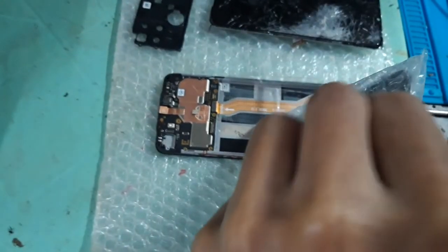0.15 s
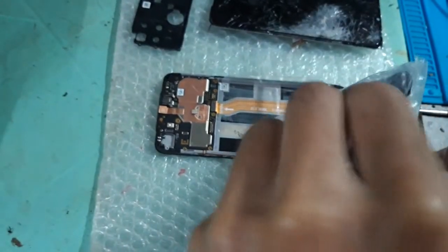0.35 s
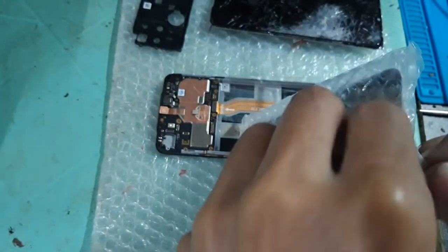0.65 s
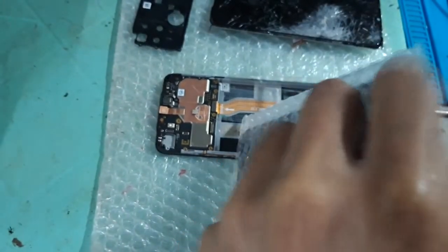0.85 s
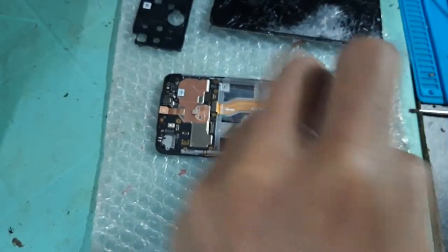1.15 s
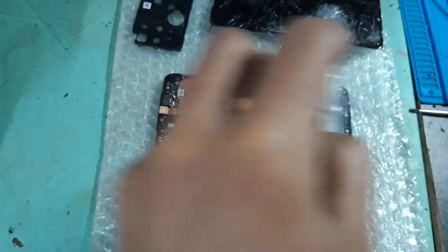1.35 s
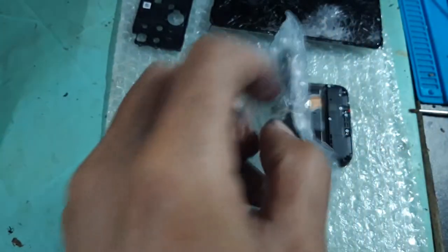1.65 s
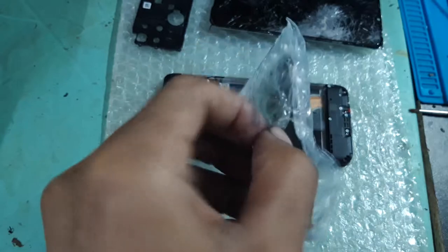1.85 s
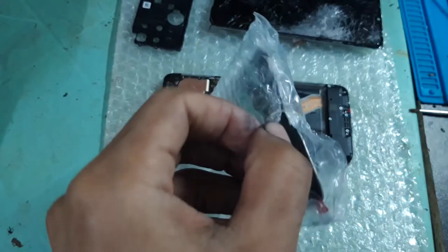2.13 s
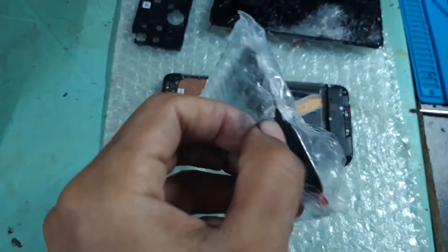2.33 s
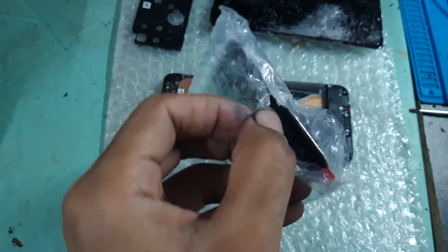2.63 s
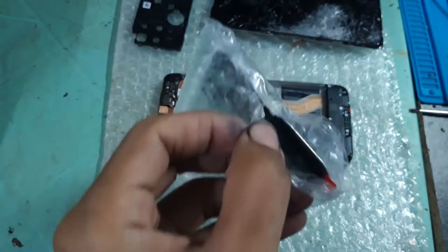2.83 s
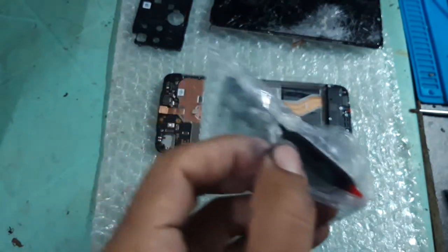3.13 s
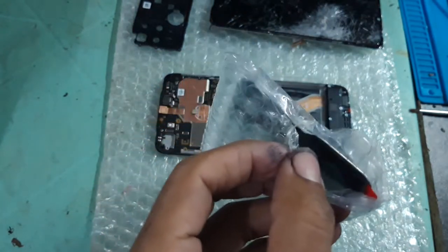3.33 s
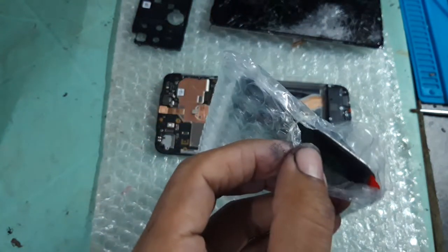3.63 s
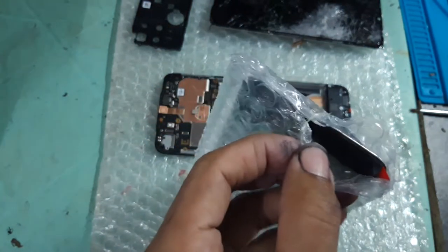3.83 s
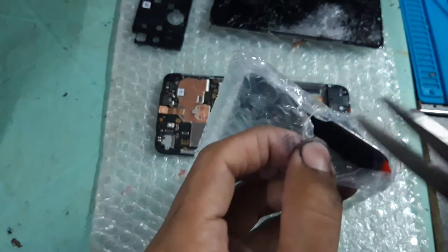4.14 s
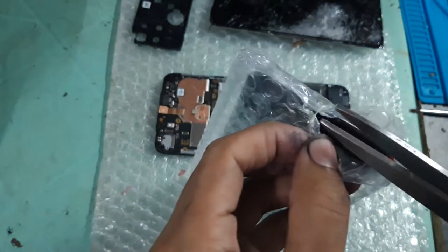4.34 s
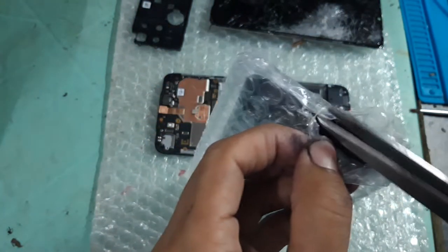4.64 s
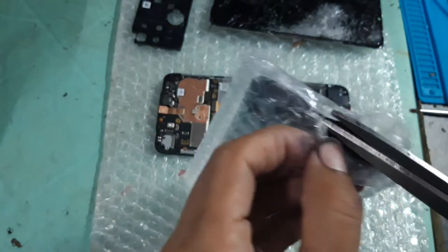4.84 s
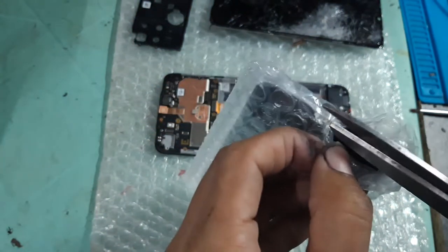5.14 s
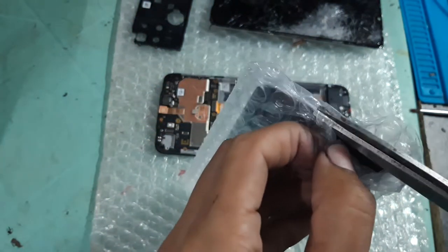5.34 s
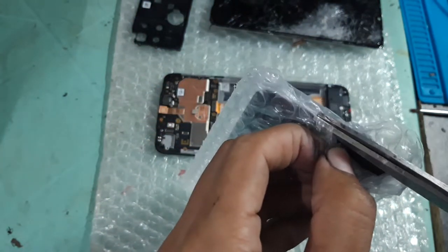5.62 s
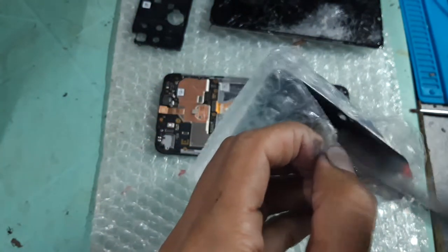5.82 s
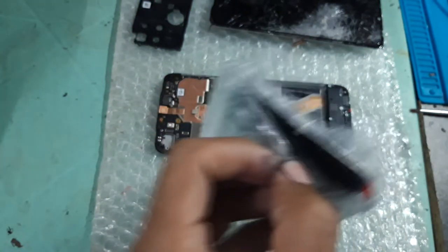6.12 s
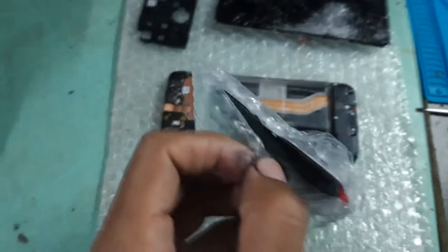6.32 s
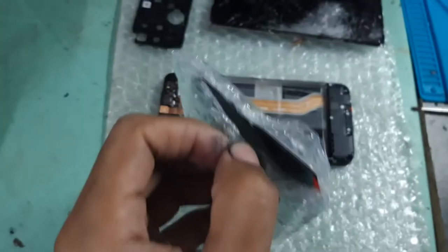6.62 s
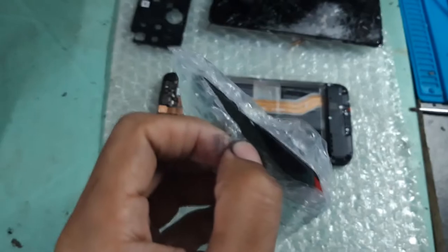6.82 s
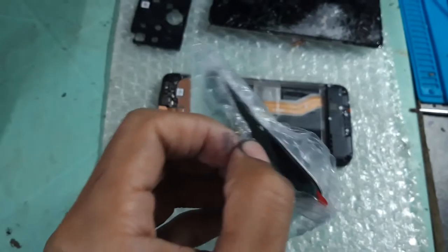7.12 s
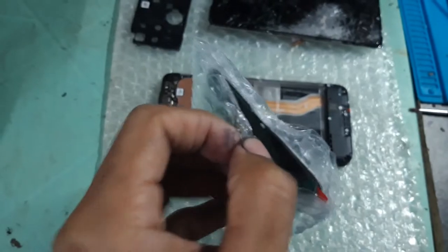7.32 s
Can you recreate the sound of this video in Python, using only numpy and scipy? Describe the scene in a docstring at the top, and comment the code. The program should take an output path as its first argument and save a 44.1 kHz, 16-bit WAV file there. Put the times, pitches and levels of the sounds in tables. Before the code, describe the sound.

A close microphone at a workbench in a small room picks up a low airy murmur, soft hiss and faint bench sway. From 0 to 1.6 s a thin plastic bag rustles lightly with dry, bright snaps, one much louder at 0.3 s. From 2.0 to 2.4 s steel tools clink and skid quietly. At 2.98 s comes a hard, ringing knock on the bench with a brief judder, then short gritty scissor scrapes from 3.1 to 3.5 s. Sparse crinkles continue, with a soft brush of blade on film at 4.85 s. At 5.7 s the scissors snip very loudly, with a short dull thump, a fading grind and a strong plastic snap. The background sinks; a tiny squeak at 6.2 s precedes a sharp blade clack at 6.35 s. From 6.9 s to the end, tools knock and rattle brightly, with a dull thump near 7 s, while the plastic is quiet.

```python
"""A thin plastic bag crinkles close to a phone above a workbench: each crease is a sharp ringing pulse,
and countless tiny ones make a rustle. A part in the bag is lifted off bubble wrap and turned in one hand.
The other hand rummages for scissors, knocks and drags them, snips the bag open and lays them back among tools:
bursts of tiny random impacts ring steel and bench, and damped swings make the thumps.
Behind it lies coloured noise: a low sway of the bench, and room noise that sinks after the snip."""
import sys
import numpy as np
from scipy import signal
from scipy.fft import rfft, irfft
from scipy.io import wavfile

SR = 44100
rng = np.random.default_rng(int(sys.argv[2]) if len(sys.argv) > 2 else 0)


def materialize(psi):
    """Save the field psi as 16-bit PCM at rate SR to the path in sys.argv[1].

    A 1-D psi becomes a single channel; in a 2-D psi each row is a channel.
    """
    bounded = np.clip(np.atleast_2d(psi).T, -1, 1)
    quanta = np.round(bounded * 32767).astype(np.int16)
    wavfile.write(sys.argv[1], SR, quanta)


N = 329427  # length in samples
TIME = np.arange(N) / SR  # s
SIZE = 8192  # samples behind each spectrum
FREQS = np.maximum(np.fft.rfftfreq(SIZE, 1 / SR), 1)  # Hz
OCTAVES = np.log2(FREQS + 200)  # scale for tilting a spectrum; it flattens out in the bass


def amp(db):
    """Turn decibels into a gain."""
    return 10 ** (np.asarray(db) / 20)


def unit(x):
    """Scale a sound to an rms of one."""
    return x / np.sqrt(np.mean(x ** 2))


def curve(rows):
    """Join rows of (t/s, value) by straight lines."""
    return np.interp(TIME, *np.transpose(rows))


def swells(rows, rest_db):
    """Level in dB of smooth movements that rise from rest and sink back; their powers add up."""
    moves = 0
    for middle, half_length, db in rows:
        moves = moves + amp(db) ** 2 * np.exp(-2 * ((TIME - middle) / half_length) ** 2)
    return 10 * np.log10(amp(rest_db) ** 2 + moves)


def add(out, start_s, x):
    """Mix the sound x into out from start_s on."""
    first = max(int(start_s * SR), 0)
    out[first:first + len(x)] += x[:max(N - first, 0)]


def through(x, response):
    """Let x ring a body, given the body's answer to a single click."""
    return signal.fftconvolve(x, response)[:N]


def spectrum(points, modes=()):
    """A broad colour in dB, with the narrow peaks of a ringing body standing on it."""
    hz, db = np.transpose(points)
    broad = np.interp(np.log(FREQS), np.log(hz), db)
    peaks = sum(amp(2 * gain) / (1 + (2 * (FREQS - f) / width) ** 2) for f, width, gain in modes)
    return broad + 10 * np.log10(1 + peaks)


def ring(db):
    """A body's answer to a click: it starts at once, has the given spectrum and an energy of one."""
    # folding the cepstrum gives the minimum-phase response, with its energy as early as possible
    cepstrum = irfft(np.log(amp(db)))
    cepstrum[1:SIZE // 2] *= 2
    cepstrum[SIZE // 2 + 1:] = 0
    response = irfft(np.exp(rfft(cepstrum)))[:SIZE // 2]
    return response / np.linalg.norm(response)


def friction(response, db, rise, length, grit_db, release):
    """One sliding contact: dense uneven tiny impacts swell, hold and let go, ringing a body (times in s)."""
    t = np.arange(int((length + 10 * release) * SR) + 2) / SR
    swell = np.minimum(t / max(rise, 1 / SR), 1)
    push = swell * np.exp(-np.maximum(t - length, 0) / release)
    # more grit makes the impacts more uneven
    impacts = rng.standard_normal(len(t)) * amp(grit_db * rng.standard_normal(len(t)))
    x = signal.fftconvolve(push * impacts, response)
    return x * amp(db) * np.linalg.norm(push) / np.linalg.norm(x)


def echoes(x, wet_db, t60_low, t60_high, delay=0.0041):
    """Add the reflections of bench and walls; bass and treble each take their own time in s to fade by 60 dB."""
    t = np.arange(SR // 2) / SR
    noise = rng.standard_normal(len(t))
    low = signal.sosfilt(signal.butter(2, 3000, fs=SR, output="sos"), noise)
    high = signal.sosfilt(signal.butter(2, 3000, "high", fs=SR, output="sos"), noise)
    low = low * np.exp(-np.log(1000) * t / t60_low)
    high = high * np.exp(-np.log(1000) * t / t60_high)
    # the minus keeps the two bands from cancelling where they meet
    tail = (low - high) * (t > delay)
    return x + amp(wet_db) * through(x, tail / np.linalg.norm(tail))


def snap(hz, octaves, skirt_db=36, flutter=.06, flutter_s=0.0034):
    """A crease flips: one sharp pulse of a small facet of film, then a brief flutter of the sheet around it."""
    # the ring falls off faster above its centre than below
    distance = np.where(FREQS < hz, np.log2(FREQS / hz), (FREQS / hz - 1) / np.log(2))
    shape_db = skirt_db * (np.exp(-(distance / octaves) ** 2 / 7) - 1)
    # so small a facet hardly radiates low notes
    bass_loss_db = 10 * np.log10(1 + (2400 / (FREQS + 500)) ** 4)
    t = np.arange(SIZE // 16) / SR
    kick = flutter * rng.standard_normal(len(t)) * np.exp(-t / flutter_s)
    kick[0] = 1
    x = signal.fftconvolve(kick, ring(shape_db - bass_loss_db))
    return x / np.linalg.norm(x)


# how loud the room noise is before it wavers: (t/s, level/dB)
ROOM_LEVEL = [(0, -51), (1.5, -51), (1.9, -47.5), (3.7, -49), (5.65, -48), (6.1, -57), (6.85, -60.5),
              (7.1, -52)]
# colour of the room noise: (f/Hz, level/dB)
ROOM_NOISE = [(28, -26.5), (60, -11), (100, -9.5), (180, -2), (300, 1.5), (400, -6.5), (600, -6.5),
              (770, -5.5), (930, -10), (1500, -11.5), (3000, -15.5), (7000, -22), (9400, -20.5),
              (10300, -31), (16000, -38.5)]


def room(waver_db=1.22):
    """Low murmur of air in the room under a soft hiss: coloured noise whose level wavers slightly."""
    noise = unit(through(rng.standard_normal(N), ring(spectrum(ROOM_NOISE))))
    knots = np.arange(0, N / SR, 1 / 10)  # ten random levels a second
    waver = np.interp(TIME, knots, rng.standard_normal(len(knots)))
    return noise * amp(curve(ROOM_LEVEL) + waver_db * waver)


ARMS_RESTING_DB = -68
# the arms move and sway the bench: (middle t/s, half length/s, level/dB)
ARM_MOVES = [(.28, .13, -57), (1.3, .08, -59), (1.68, .06, -60), (2.25, .2, -55), (4.45, .2, -60),
             (7.42, .1, -54)]


def rumble():
    """A soft low swaying of the bench: deep noise that swells as the arms move."""
    colour = spectrum([(20, -36), (42, -5), (56, 1), (80, -14.5), (200, -50)])  # (f/Hz, level/dB)
    noise = through(rng.standard_normal(N), ring(colour))
    return unit(noise) * amp(swells(ARM_MOVES, ARMS_RESTING_DB))


# dull thumps through bench and phone stand:
# (t/s, level/dB before build-up and fading, f/Hz, rise/s, time to fade by 60 dB/s)
THUMPS = [(5.7094, 8.5, 400, 0.000103, 0.00271), (5.7104, -5, 71.2, 0.00041, 0.036),
          (5.7165, -12.5, 87.5, 0.0009, .024), (6.231, -25, 970, .0001, 0.00302),
          (6.2325, -33, 152, 0.00057, 0.033), (6.980, -13.5, 556.5, 0.00301, 0.0485)]


def thumps(crack_db=-1.5, crack_s=0.001215, crack_hz=2000):
    """Each jolt is a few quickly damped swings with a crack at the contact; the next one swings the other way."""
    out, t = np.zeros(N), np.arange(SIZE) / SR
    dull = signal.butter(1, min(crack_hz, SR / 3), fs=SR, output="sos")
    for k, (s, db, hz, rise, t60) in enumerate(THUMPS):
        swing = np.sin(2 * np.pi * hz * t) * np.exp(-np.log(1000) * t / t60)
        crack = signal.sosfilt(dull, rng.standard_normal(SIZE)) * np.exp(-t / crack_s)
        # a harder contact both rings higher and cracks more
        crack = amp(crack_db) * hz / 700 * crack
        direction = -(-1) ** k
        add(out, s, direction * amp(db) * (swing + crack) * (1 - np.exp(-t / rise)))
    return out


# steel tools bump into each other:
# (t/s, level/dB, length/s, tilt/dB per octave, f/Hz at which the touched piece rings)
SCUFFS = [(2.031, -38, .011, -4, 485), (2.062, -40, .012, -2, 3870), (2.104, -45, .008, -1.5, 5100),
          (2.165, -35, .008, -1.5, 3750), (2.173, -27.5, .008, -.7, 3750), (2.218, -30, .011, -1.5, 3810),
          (2.255, -29, .009, -.5, 5080), (2.347, -31, .009, -.5, 3800), (6.902, -35, .004, 0, 3380),
          (6.922, -28, .02, 2.2, 8600), (6.972, -23.5, .011, -1, 920), (7.144, -36.5, .006, .5, 4770),
          (7.2085, -22, .0105, 1.5, 9120), (7.319, -28.5, .009, 1, 3820), (7.3578, -19.5, .009, 4.5, 13800),
          (7.377, -26.5, .015, -1, 10800), (7.435, -20.5, .011, .5, 4700)]
# the hand shoves the pile along with growing force: (t/s, final level/dB, length/s, tilt/dB per octave)
SHOVES = [(2.1, -49, .28, -2), (7.005, -36, .03, -1), (7.06, -51, .07, 0), (7.155, -39, .04, -3.5),
          (7.265, -34.5, .045, 1), (7.395, -37, .035, 1), (7.445, -28, .02, .8)]
# broad colour of the steel: (f/Hz, level/dB)
STEEL = [(80, -22.5), (250, -18), (480, -7.5), (750, -11), (1200, -10), (3000, -8), (5500, -7), (9200, -11),
         (10200, -14), (13000, -17), (16000, -23.5)]
# ring of the tools: (f/Hz, width/Hz, level/dB relative to the broad colour)
STEEL_MODES = [(555, 90.5, 9), (931.5, 42.5, 7), (1139, 59, 4), (1735, 38, -5), (3780, 90, -1),
               (9260, 110, 8.5)]
BUMP_RISE_S, BUMP_RELEASE_S = .001, .002
# after each bump the piece skids on, quieter and duller; after a hard bump it skids further
SKID_DB, SKID_TILT_DB, SKID_RELEASE_S = -13, -.2, .005  # level relative to the bump, tilt per octave
HARD_BUMP_DB, HARD_SKID_S, SKID_DOUBLES_DB = -22, .028, 6  # up to a hard bump, each 6 dB doubles the skid


def tools(ring_db=5, ring_q=15):
    """Steel bumps on steel and skids on while the pile is shoved along, with plenty of room on it."""
    out, colour = np.zeros(N), spectrum(STEEL, STEEL_MODES)
    skid_body = ring(colour + SKID_TILT_DB * OCTAVES)
    for s, db, length, tilt, hz in SCUFFS:
        piece = spectrum(STEEL, [*STEEL_MODES, (hz, hz / ring_q, ring_db)]) + tilt * OCTAVES
        add(out, s, friction(ring(piece), db, BUMP_RISE_S, length, grit_db=5, release=BUMP_RELEASE_S))
        skid_s = HARD_SKID_S * 2 ** (min(db - HARD_BUMP_DB, 0) / SKID_DOUBLES_DB)
        skid = friction(skid_body, db + SKID_DB, BUMP_RISE_S, skid_s, grit_db=6, release=SKID_RELEASE_S)
        add(out, s + length, skid)
    for s, db, length, tilt in SHOVES:
        body = ring(colour + tilt * OCTAVES)
        add(out, s, friction(body, db, length, length, grit_db=5.5, release=.008))
    return echoes(out, wet_db=-5.5, t60_low=0.267, t60_high=0.1665, delay=0.00586)


# strokes of the scissors dragged over the bench: (t/s, level/dB, length/s)
DRAGS = [(3.078, -42, .022), (3.112, -36.5, .033), (3.15, -32, .029), (3.18, -47, .1), (3.32, -48, .04),
         (3.381, -28, .0736), (3.455, -38, .036)]
# broad colour of the bench: (f/Hz, level/dB)
BENCH = [(40, -33), (100, -11), (200, -8), (400, -4), (750, -10), (1100, -6), (1500, -11.5), (2600, -6),
         (3200, -10), (6000, -8.5), (9200, -10.5), (10000, -16.5), (16000, -18.5)]
# ring of the bench: (f/Hz, width/Hz, level/dB relative to the broad colour)
BENCH_MODES = [(137, 16, 9.5), (407.6, 30, 3), (505.2, 24, 13), (565, 38, 6), (907, 27, 9),
               (1038.7, 63, 11.5), (1120, 70, 3), (1718.6, 30, 7.5), (1978, 28, 8), (2100, 25, 1),
               (2434, 50, 11.5), (2670, 80, 8), (3354, 45, 10), (3740, 40, 9), (4390, 70, 5), (4540, 40, 3),
               (5560, 50, 3), (6240, 23, -3.5), (8090, 100, 6), (9030, 70, 10.5)]
# colour of the board booming under the knock: (f/Hz, level/dB)
BOOM = [(40, -28), (80, -3), (130, 0), (200, -11), (320, -11), (600, -38)]
KNOCK_S, KNOCK_DB, KNOCK_LENGTH_S = 2.98, -9.5, .004
JUDDER_DB, JUDDER_S, JUDDER_RELEASE_S, JUDDER_TILT_DB = -25, .04, .006, -1.7  # tilt per octave
BOOM_DB, BOOM_RELEASE_S = -38, .05
DRAG_RISE_SHARE = .58  # part of a stroke spent gathering speed
# a lighter stroke is duller: dB per octave lost for each dB below a firm one
FIRM_DRAG_DB, DULLING_PER_DB = -31, .22


def bench():
    """A hard knock with its judder and boom, then the scissors slide in a few strokes over the ringing bench."""
    out, colour = np.zeros(N), spectrum(BENCH, BENCH_MODES)
    knock = friction(ring(colour), KNOCK_DB, .00094, KNOCK_LENGTH_S, grit_db=2, release=.0014)
    add(out, KNOCK_S, knock)
    after = KNOCK_S + KNOCK_LENGTH_S
    body = ring(colour + JUDDER_TILT_DB * OCTAVES)
    add(out, after, friction(body, JUDDER_DB, .0018, JUDDER_S, grit_db=3, release=JUDDER_RELEASE_S))
    board = ring(spectrum(BOOM))
    add(out, after, friction(board, BOOM_DB, 0, KNOCK_LENGTH_S, grit_db=0, release=BOOM_RELEASE_S))
    for s, db, length in DRAGS:
        body = ring(colour + DULLING_PER_DB * (db - FIRM_DRAG_DB) * OCTAVES)
        add(out, s, friction(body, db, DRAG_RISE_SHARE * length, length, grit_db=3, release=.002))
    return echoes(out, wet_db=-9, t60_low=0.227, t60_high=0.16, delay=0.005155)


# the blades shear and clack: (t/s, level/dB, rise/s, length/s, release/s, tilt/dB per octave)
BLADES = [(5.705, -28, .0002, 0.0019, .0005, 1), (5.7088, -6, 0.00022, 0.00068, 0.00041, 1.8),
          (5.7132, -16.5, 0.0052, 0.0074, 0.02196, 0.24), (6.2307, -36, .0001, 0.00142, 0.00174, -4),
          (6.3516, -13, .0001, 0.00063, 0.00134, -0.22), (6.354, -37.5, 0.00092, .004, 0.0229, -0.75)]
# broad colour of the blades: (f/Hz, level/dB)
BLADE = [(200, -26.5), (900, -25.5), (1370, -12), (2100, -26), (2900, -12.5), (4800, -11.5), (6000, -9),
         (6500, 0.5), (7600, 0), (10200, 0), (11200, -9.5), (13000, -17), (16000, -13)]
# ring of the blades: (f/Hz, width/Hz, level/dB relative to the broad colour)
BLADE_MODES = [(3890, 220, 6), (6950, 60, -2.5), (7600, 87, -3.5), (14250, 300, 1.5)]
# the pivot squeaks as the blades open again
SQUEAK_S, SQUEAK_DB, SQUEAK_HZ, SQUEAK_LENGTH_S = 6.2135, -44.5, 9350, .016


def scissors():
    """The edges bite and grind shut with a fading hiss; later the pivot squeaks and the blades clack once more."""
    out, colour = np.zeros(N), spectrum(BLADE, BLADE_MODES)
    for s, db, rise, length, release, tilt in BLADES:
        body = ring(colour + tilt * OCTAVES)
        add(out, s, friction(body, db, rise, length, grit_db=2.5, release=release))
    swell = np.hanning(int(SQUEAK_LENGTH_S * SR))
    tone = np.sin(2 * np.pi * SQUEAK_HZ * TIME[:len(swell)])
    add(out, SQUEAK_S, amp(SQUEAK_DB) * swell * tone)
    return echoes(out, wet_db=-19.5, t60_low=.2, t60_high=.2)


def slide():
    """The open blade brushes the film as it slips into the bag: one soft, gritty stroke."""
    out = np.zeros(N)
    film = snap(4860, 1.0)
    add(out, 4.835, friction(film, db=-45.5, rise=0.068, length=0.0833, grit_db=7.5, release=.018))
    return out


HOLD_DB = -64  # rustle of the bag merely held
STILL_S, STILL_DB_PER_S = 6.3, 100  # from here on the hand rests and the film falls quiet
# the fingers shift their grip and the film slides: (middle t/s, half length/s, level/dB)
GRIPS = [(.12, .14, -57), (.275, .04, -43.5), (.52, .06, -48), (.68, .09, -56), (.92, .03, -56),
         (1.9, .14, -55), (2.88, .06, -54.5), (3.75, .05, -55), (5.35, .2, -57), (5.89, .05, -53)]


def handling():
    """How hard the fingers work the film, as its rustle level in dB."""
    return swells(GRIPS, HOLD_DB) - STILL_DB_PER_S * np.maximum(TIME - STILL_S, 0)


def rustle(rate=1500, spread_db=6.0):
    """Countless tiny creases on facets of three sizes, as loud as the fingers move."""
    out = 0
    for hz, db in [(4800, 2.5), (8000, 4.5), (12000, -7)]:
        sizes = amp(spread_db * np.minimum(rng.exponential(size=N), 5)) * rng.choice([-1, 1], N)
        happens = rng.random(N) < rate / SR  # on average `rate` creases a second
        out = out + amp(db) * through(sizes * happens, snap(hz, 0.64))
    return echoes(unit(out) * amp(handling()), wet_db=-13.5, t60_low=.2, t60_high=.16)


# small creases: their rate at a rustle of BUSY_DB and its power law
BUSY_DB, TICKS_PER_S, TICK_POWER = -50, 23, 1.1
# their typical level and ring, each with its scatter
TICK_DB, TICK_SPREAD_DB, TICK_HZ, TICK_SPREAD_OCTAVES = -46, 2, 7600, .2


def small_creases(count=200):
    """Faint snaps at chance moments, more frequent as the fingers work: rows of (t/s, level/dB, f/Hz)."""
    rate = TICKS_PER_S * amp(handling() - BUSY_DB) ** TICK_POWER
    due = np.cumsum(rate) / SR  # number of snaps due so far
    turns = np.arange(count) + rng.random(count)
    chance = rng.standard_normal((count, 2))
    rows = []
    for turn, (size, pitch) in zip(turns, chance):
        if turn < due[-1]:
            s = np.interp(turn, due, TIME)
            hz = TICK_HZ * 2 ** (TICK_SPREAD_OCTAVES * pitch)
            rows.append((s, TICK_DB + TICK_SPREAD_DB * size, hz))
    return rows


# a harder snap is shorter and so rings more broadly: width of a soft one, and its growth
SOFT_SNAP_DB, SOFT_SNAP_OCTAVES, OCTAVES_PER_DB = -40, .48, .018
# the creases that snap out loud: (t/s, level/dB over 2 ms, ring f/Hz)
CREASES = [(0.0109, -40, 7200), (0.076, -41, 5460), (0.1958, -41, 7500), (0.2155, -35, 8260),
           (0.272, -36, 6400), (0.3011, -15.5, 10300), (0.3382, -35, 7100), (0.461, -38, 8800),
           (0.559, -41, 4700), (0.5671, -38.5, 4500), (0.738, -42, 8100), (0.764, -30, 13700),
           (0.7793, -28.5, 10300), (0.9915, -43, 6800), (1.1418, -28, 7200), (1.3042, -40.5, 8340),
           (1.646, -33, 8280), (2.825, -39, 9700), (3.228, -37.5, 6830), (3.3377, -43, 6500),
           (3.7103, -38, 8900), (3.8421, -35, 5140), (3.9165, -37.5, 8580), (3.963, -38.5, 5900),
           (4.1892, -42, 7300), (4.3065, -33, 5610), (4.3246, -38.5, 5740), (5.1552, -41, 6660),
           (5.311, -34.5, 8100), (5.4566, -29.5, 6600), (5.7249, -15.5, 5900), (5.9035, -39, 4750),
           (6.02, -35.5, 6340)]


def creases():
    """Single snaps, loud and faint, as the bag bends."""
    out = np.zeros(N)
    window = np.sqrt(.002 * SR)  # turns a level over 2 ms into the strength of a pulse
    for s, db, hz in [*CREASES, *small_creases()]:
        octaves = SOFT_SNAP_OCTAVES + OCTAVES_PER_DB * max(db - SOFT_SNAP_DB, 0)
        add(out, s, amp(db) * window * snap(hz, octaves))
    return echoes(out, wet_db=-15, t60_low=.2, t60_high=.17)


def scene():
    """All sources added up at one microphone."""
    background = room() + rumble()
    work = thumps() + tools() + bench() + scissors()
    bag = slide() + rustle() + creases()
    return (background + work + bag)[None]


TOP_HZ = 15900  # highest note the phone lets through


def record(dry):
    """The phone thins the deepest bass, clips at full scale and cuts the top."""
    thin = signal.sosfilt(signal.butter(1, 25, "high", fs=SR, output="sos"), dry)
    clipped = np.clip(thin, -1, 1)
    return signal.sosfilt(signal.ellip(10, .2, 80, TOP_HZ, fs=SR, output="sos"), clipped)


dry = scene()
out = record(dry)
materialize(out)
```